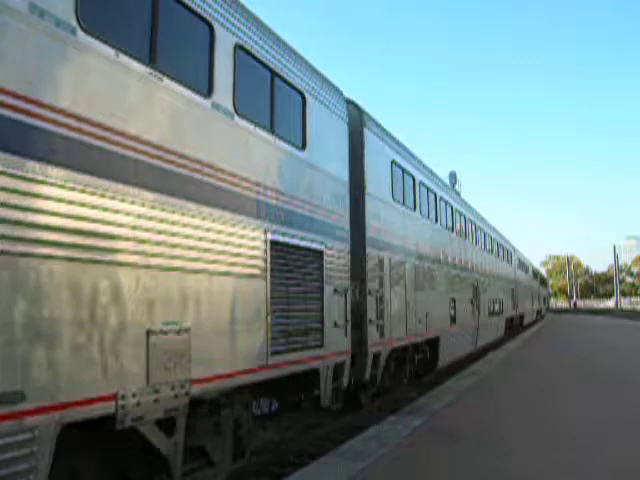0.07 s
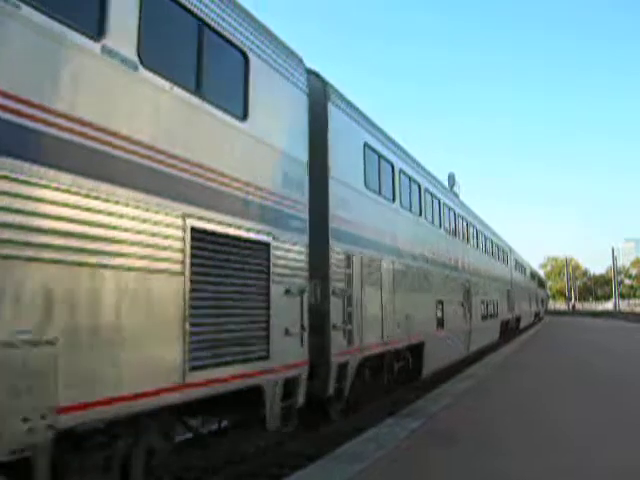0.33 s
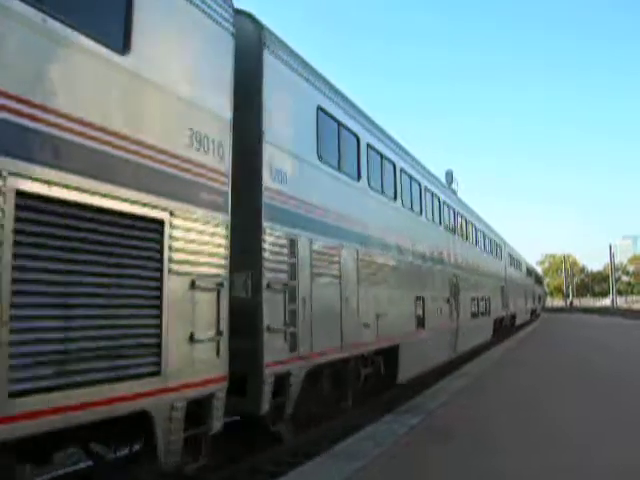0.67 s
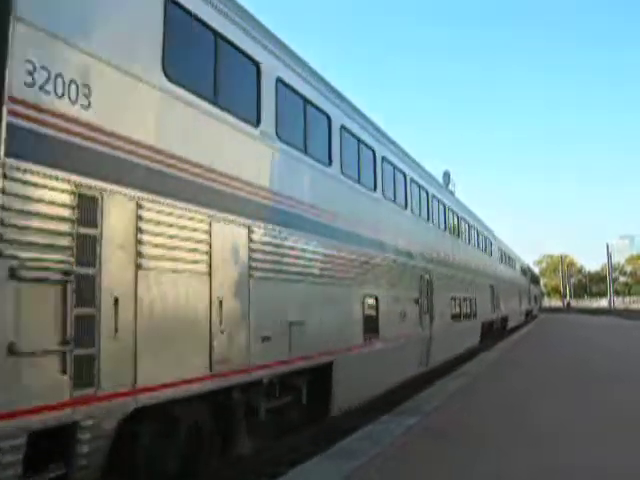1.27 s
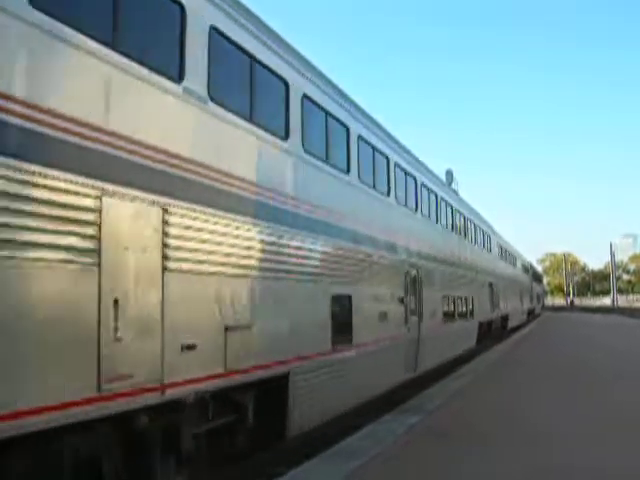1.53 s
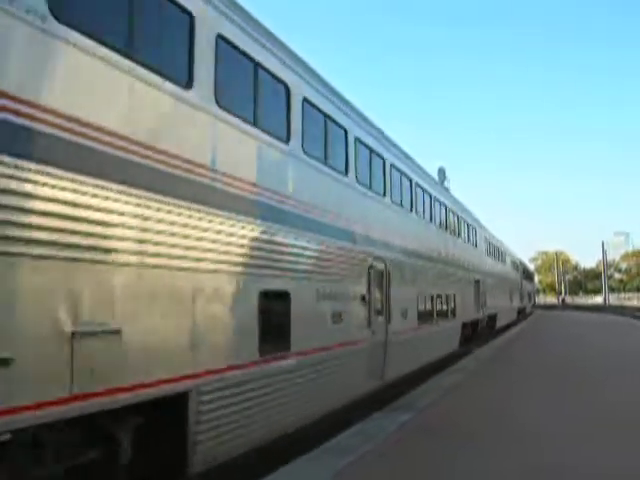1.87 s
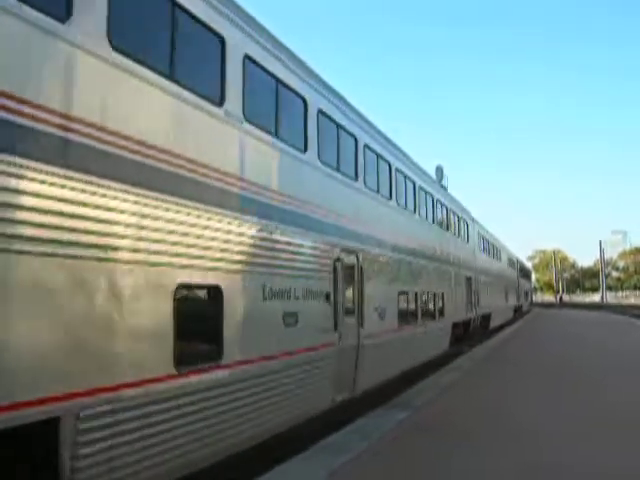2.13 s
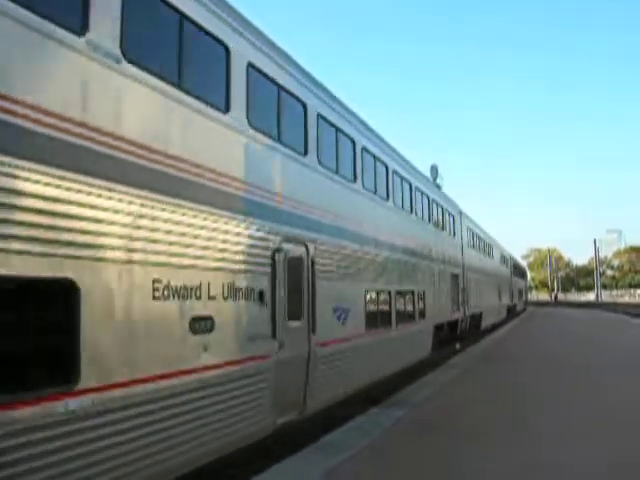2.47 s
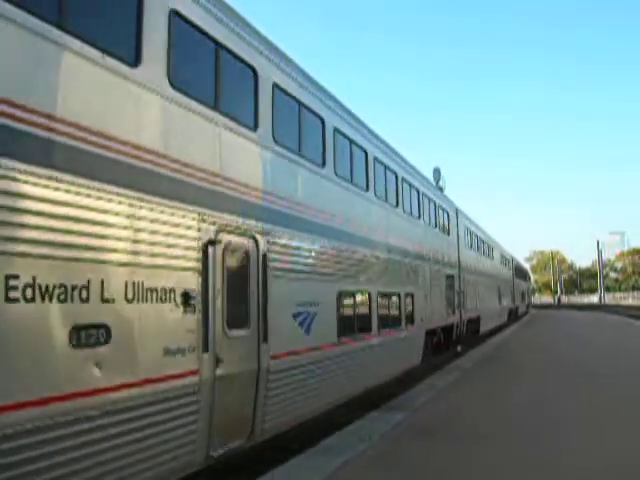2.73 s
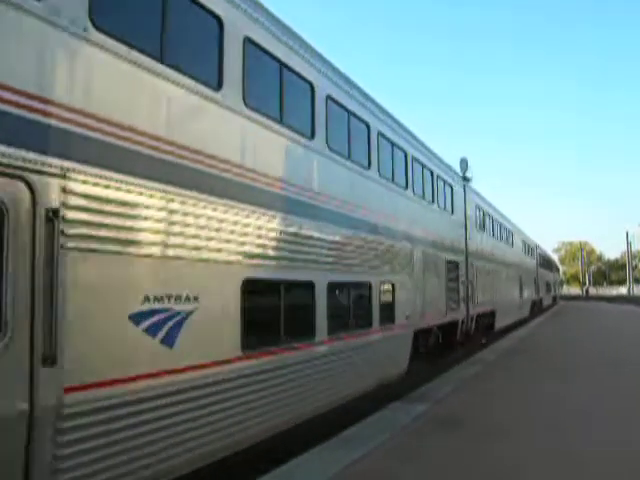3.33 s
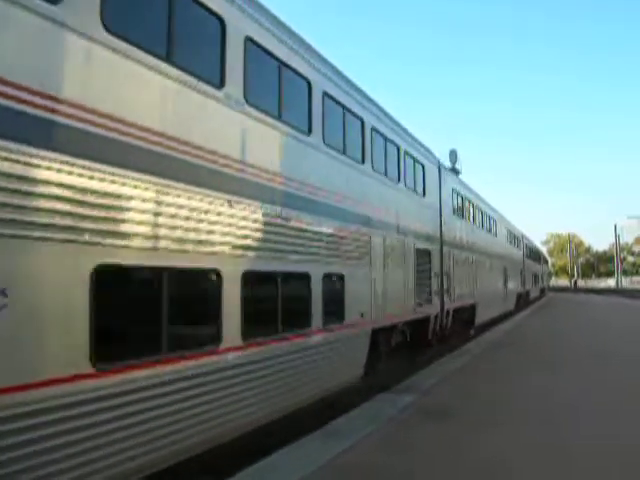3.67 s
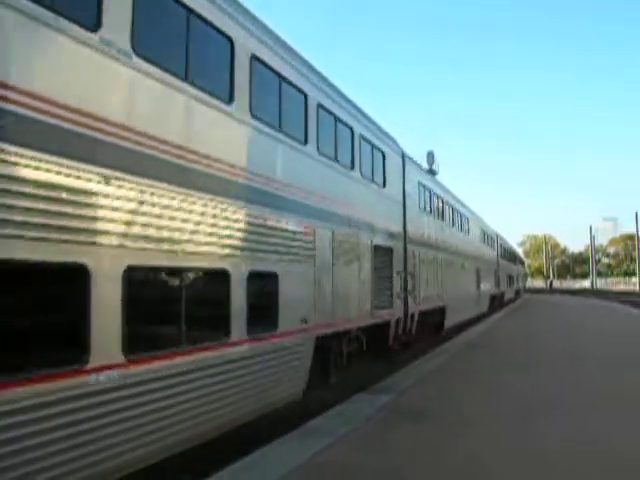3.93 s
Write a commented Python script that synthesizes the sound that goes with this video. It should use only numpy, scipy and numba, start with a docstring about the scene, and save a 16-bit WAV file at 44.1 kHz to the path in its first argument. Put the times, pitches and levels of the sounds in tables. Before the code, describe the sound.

A passenger train rolls past close by, its wheels roaring and hissing on the rails with irregular clunks. A ventilation fan hums underneath. The small microphone on the platform sounds dull and crackles on the harder knocks.

```python
"""A station platform, with a double-deck passenger train rolling past up close.
Rough wheels roar and hiss on the rails, the running gear clunks, and a steel part rings once.
Underneath, a ventilation fan hums and machinery drones. It is all heard through a small camera whose
gain control ducks after every hard clunk and creeps back up. Its treble ends near 4 kHz,
and brief spikes overload it and crackle."""
import sys
import numpy as np
from scipy import signal
from scipy.fft import irfft
from scipy.io import wavfile
from numba import njit

SR = 44100
rng = np.random.default_rng(int(sys.argv[2]) if len(sys.argv) > 2 else 0)


def log_audio(samples):
    """Write samples as a 16-bit WAV file to the path given in sys.argv[1]."""
    # one column per channel
    frames = np.atleast_2d(samples).T
    # limit to full scale, then quantise
    limited = np.clip(frames, -1, 1)
    pcm = np.round(limited * 32767).astype(np.int16)
    wavfile.write(sys.argv[1], SR, pcm)


N = 176400


def undb(db):
    """Decibels to gain."""
    return 10 ** (np.asarray(db) / 20)


def unit_rms(x):
    """Scale to rms 1."""
    return x / np.sqrt(np.mean(x ** 2) + 1e-18)


def automation(rows):
    """Join (time_s, value) breakpoints with straight lines."""
    return np.interp(np.arange(N) / SR, *np.array(rows).T)


def eq_curve(points, f):
    """Gain at frequencies f of a (freq_hz, level_db) curve."""
    hz, db = np.array(points).T
    return undb(np.interp(np.log(f), np.log(hz), db))


def resonance(f, hz, width):
    """Response of one damped resonance."""
    return 1 / (1 + 1j * (f * f - hz * hz) / (f * width))


def noise(response, size=N):
    """Noise of rms 1 with the given frequency response."""
    f = np.maximum(np.fft.rfftfreq(size, 1 / SR), 1)
    phases = np.exp(2j * np.pi * rng.random(len(f)))
    return unit_rms(irfft(response(f) * phases, size))


def drift(rate_hz):
    """Smooth random modulation of rms 1."""
    return noise(lambda f: np.exp(-(f / rate_hz) ** 2))


# Tone of the low rolling roar: freq_hz, level_db
ROAR_EQ = [(25, -25.5), (45, -22), (60, -13.5), (85, -0.5), (110, -4), (160, -5), (230, 0.5), (330, 1),
           (450, 0), (600, -1.5), (830, -0.5), (1100, -9), (1600, -16), (2400, -11.5), (4000, -44)]
# Tone of the steel hiss: freq_hz, level_db
HISS_EQ = [(600, -21.5), (1100, 1), (1600, 5), (2200, 2), (2800, 4.5), (3300, 4.5), (3700, -3), (4000, -11),
           (4500, -39)]
# Swells and dips of the hiss: time_s, level_db
HISS_SWELLS = [(0, -1.5), (.22, 2.2), (.45, 1.5), (.6, 2), (.85, -1), (1.0, -0.5), (1.26, 2), (1.35, -0.5),
               (1.65, 1.5), (1.9, -3.5), (2.17, 2.5), (2.28, 0), (2.36, -2), (2.5, -2), (3.0, 0.5),
               (3.25, 0), (3.5, 1), (4, 0.5)]
# Narrow resonances of wheels and car body: pitch_hz, nominal_width_hz, level_db
BODY_MODES = [(82.9, 6, -34.5), (542, 3.2, -35.5), (620.3, 8.5, -33.5), (1075, 8.2, -34.5),
              (1170, 7.2, -36), (1515, 12, -34.5), (2780, 33, -39.5)]
def rolling(roar_db=-15.5, hiss_db=-18.5):
    """Rough wheels on rough rails: a restless roar, a steel hiss and narrow resonances."""
    roar = noise(lambda f: eq_curve(ROAR_EQ, f)) * undb(roar_db + drift(3.5))
    hiss = noise(lambda f: eq_curve(HISS_EQ, f))
    hiss *= undb(hiss_db + automation(HISS_SWELLS) + 1.34 * drift(35))
    body = sum(undb(db) * noise(lambda f: resonance(f, hz, 0.99 * width) ** 2)
               for hz, width, db in BODY_MODES)
    return roar + hiss + body


# Tone of the crash in every clunk: freq_hz, level_db
CRASH_EQ = [(25, -44.5), (50, -23), (150, -9.5), (300, 3.5), (800, -3), (1300, -18.5), (2500, -19.5),
            (4500, -43)]
# Running gear hits: start_s, level_db, pitch_hz, decay_s, tone_over_thud_db
CLUNK_HITS = [(.211, -11.5, 642, 0.03, 1), (0.312, -9, 1096, 0.02, -15), (0.375, -3, 311, 0.0098, -6.5),
              (.585, -7.5, 272, 0.037, -7), (.700, -7.5, 706, 0.006, -6), (.768, -11, 297, 0.046, 1),
              (.793, -9.5, 326, 0.021, 2), (.806, -5, 241, 0.004, 2.5), (.871, -10.5, 680, 0.011, -1),
              (1.064, -16, 538, 0.015, -4), (1.274, -7.5, 432, 0.032, -0.5), (1.295, -8.5, 850, 0.0087, 3),
              (1.717, -12, 415, 0.02, 5), (1.776, -13.5, 550, 0.0076, -1), (1.855, -16, 757, 0.018, 0),
              (2.197, -5.5, 1480, 0.0094, -11), (2.203, -2.5, 293, 0.016, 4), (2.248, -1.5, 567, 0.006, 4),
              (2.26, 2, 418, 0.011, 6.5), (2.686, -15, 746, .013, -1), (2.727, -8.5, 341, .028, 5.5),
              (2.799, -4, 623, 0.011, 12.5), (2.965, -17.5, 863, 0.012, -6), (3.113, -15, 525, 0.022, 3),
              (3.161, -7, 823, .013, -12), (3.278, -14.5, 1048, 0.021, 0), (3.297, -9.5, 712, 0.03, -7),
              (3.639, -2, 460, 0.011, 7), (3.747, -7.5, 718, 0.017, -3), (3.75, -9, 307, 0.034, 13),
              (3.856, -9.5, 707, 0.025, -3)]
def clunks(attack_s=0.0017, crash_db=-0.5, tail_db=-9.5, tail_decay_s=0.012):
    """Each blow in the running gear is a damped, pitched thud with a broad crash and a short tail."""
    size = 16384
    out, age = np.zeros(N + size), np.arange(size) / SR
    for start, db, hz, decay, tone_db in CLUNK_HITS:
        rise = 1 - np.exp(-age / attack_s)
        envelope = rise * np.exp(-age / decay)
        tone = undb(tone_db) * np.sin(2 * np.pi * hz * age)
        thud = noise(lambda f: resonance(f, hz, width=0.26 * hz) ** 2, size)
        crash = noise(lambda f: eq_curve(CRASH_EQ, f), size)
        hit = unit_rms(envelope * (tone + thud + undb(crash_db) * crash))
        hit *= np.sqrt(np.mean(envelope ** 2)) / envelope.max()  # rms near 1 at the crest
        tail = undb(tail_db) * rise * np.exp(-age / tail_decay_s) * crash
        i = int(start * SR)
        out[i:i + size] += undb(db) * (hit + tail)
    return out[:N]


# Spikes that clip and crackle, mostly on clunks: start_s, level_db, repeat_ratio
CLIP_CRACKLES = [(0.1797, 0.5, 0), (.3838, 9, 0), (0.7973, 3.5, 0), (1.0708, 2, 0.15), (1.2819, 4, 0.65),
                 (1.6625, 0, 0), (1.7796, 2.5, 0.3), (2.199, 4, .3), (2.2537, 9, .1), (2.6918, 1, 0.7),
                 (2.7286, 0, 1), (3.1668, 3.5, 0), (3.6419, 0, 1), (3.7537, 7.5, 0)]
def overload_spikes(t, spike_width_s=0.00018, repeat_gap_s=0.003):
    """Spikes under a millisecond long overload the camera, each with up to two repeated ticks."""
    out = np.zeros(N)
    for start, db, repeat_ratio in CLIP_CRACKLES:
        near = np.abs(t - start) < 0.02
        for tick in range(3):
            offset = (t[near] - start - tick * repeat_gap_s) / spike_width_s
            spike = (1 - offset ** 2) * np.exp(-offset ** 2)
            out[near] -= undb(db) * repeat_ratio ** tick * spike
    return out


def steel_ring(t, start_s=0.325, pitch_hz=797, level_db=-4.5, attack_s=0.014, decay_s=0.027):
    """A steel part sings briefly on one note."""
    age = np.maximum(t - start_s, 0)
    envelope = (1 - np.exp(-age / attack_s)) * np.exp(-age / decay_s)
    return undb(level_db) * envelope / envelope.max() * np.sin(2 * np.pi * pitch_hz * age)


# Ventilation hum going by: time_s, level_db, flutter_share
FAN_PASS = [(0, -22.5, .1), (0.202, -13, 0.11), (.55, -12.5, 0), (.78, -17, 0.11), (.85, -19.5, 0),
            (.92, -15, 0.01), (1.149, -17, 0.5), (1.45, -18, 0.72), (2.201, -25, 0.7), (2.8, -26, 0.82),
            (3.201, -19, 0.2), (4, -25, 0.37)]
def fan(t, pitch_hz=265.6, fall_hz_per_s=0.74):
    """A wavering hum, loud and clean as the vent grille goes by, breaking up into flutter behind it."""
    rows = np.array(FAN_PASS)
    level_db = automation(rows[:, [0, 1]])
    flutter_share = automation(rows[:, [0, 2]])
    hz = pitch_hz - fall_hz_per_s * t + 2.5 * drift(24)
    hum = np.sqrt(2) * np.sin(2 * np.pi * np.cumsum(hz) / SR)
    hum *= undb(0.74 * drift(17))
    flutter = noise(lambda f: resonance(f, pitch_hz, width=21) ** 2)
    return undb(level_db) * (np.sqrt(1 - flutter_share) * hum + np.sqrt(flutter_share) * flutter)


# Partials of the machinery drone: harmonic_number, level_db
DRONE_PARTIALS = [(1, -40.5), (3, -34), (5, -30.5), (6, -32)]
def machinery(pitch_hz=66.1, waver_hz=0.495, swell_db=5.1):
    """Machinery under the floor drones on a few partials, each swelling and fading on its own."""
    cycles = np.cumsum(pitch_hz + waver_hz * drift(5.83)) / SR
    return sum(np.sqrt(2) * undb(db + swell_db * drift(1.1)) * np.sin(2 * np.pi * harmonic * cycles)
               for harmonic, db in DRONE_PARTIALS)


def scene():
    """The passing train in mono: a rolling bed with hits on top."""
    t = np.arange(N) / SR
    bed = rolling() + machinery() + fan(t)
    return (bed + clunks() + overload_spikes(t) + steel_ring(t))[None]


@njit
def follow_peaks(rectified, attack_s, hold_s, release_s):
    """Envelope follower: quick up, a short hold, slow down."""
    out, level, hold_left = np.empty(len(rectified)), 0.5, 0.0
    for i in range(len(rectified)):
        hold_left -= 1
        if rectified[i] > level:
            level += (rectified[i] - level) / (attack_s * SR)
            hold_left = hold_s * SR
        elif hold_left < 0:
            level -= level / (release_s * SR)
        out[i] = level
    return out


def record(dry, threshold=0.38, lag_s=0.00033, makeup_db=1.48, soft_ceiling=0.92, clip_level=0.71):
    """Gain control ducks and recovers slowly; spikes too quick for it clip and crackle."""
    t = np.arange(N) / SR
    peak = follow_peaks(np.abs(dry[0]), attack_s=0.0023, hold_s=0.0053, release_s=0.23)
    gain = np.interp(t - lag_s, t, np.minimum(1, threshold / peak))
    saturated = soft_ceiling * np.tanh(undb(makeup_db) * dry * gain / soft_ceiling)
    treble_cut = signal.ellip(8, 0.2, 70, 4250, fs=SR, output="sos")
    dull = signal.sosfilt(treble_cut, saturated)
    clipped = np.maximum(dull, -clip_level)  # negative peaks only; crackles above the treble cut
    crackle_cut = signal.ellip(8, 0.2, 70, 15900, fs=SR, output="sos")
    return signal.sosfilt(crackle_cut, clipped)


dry = scene()
out = record(dry)
log_audio(out)
```